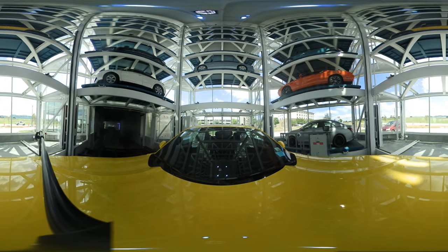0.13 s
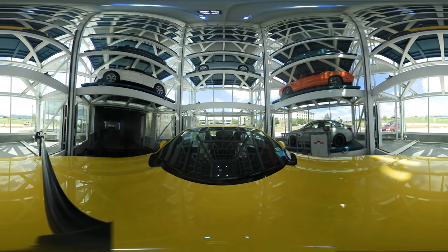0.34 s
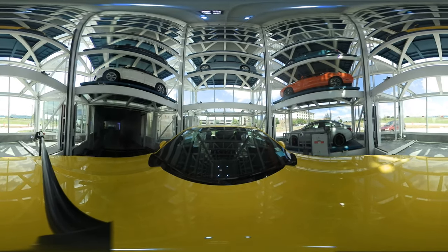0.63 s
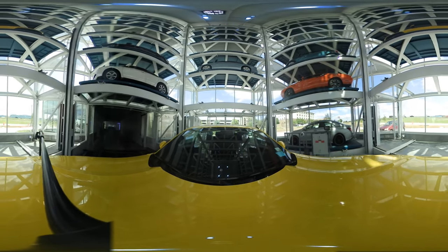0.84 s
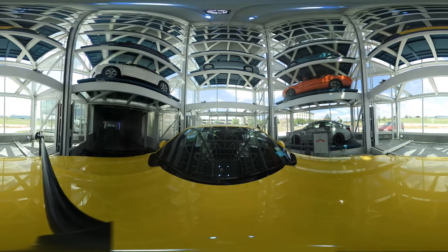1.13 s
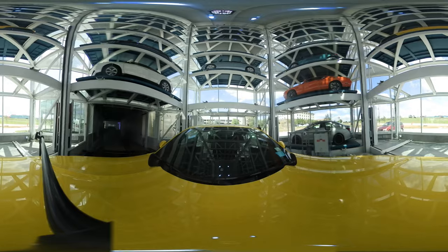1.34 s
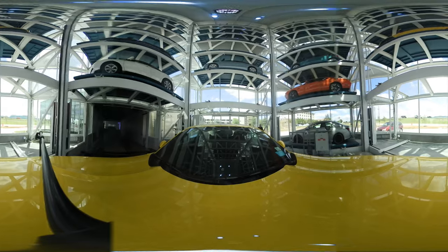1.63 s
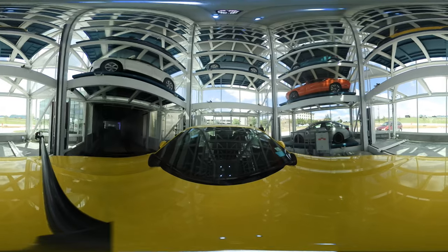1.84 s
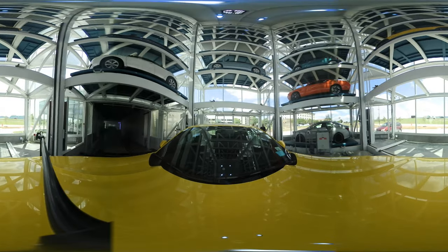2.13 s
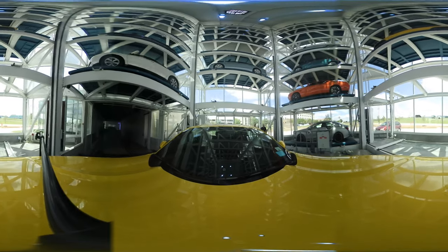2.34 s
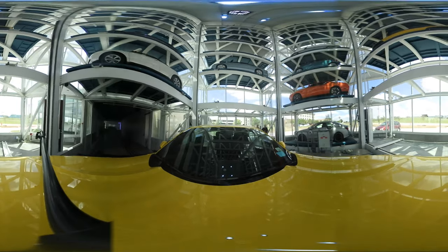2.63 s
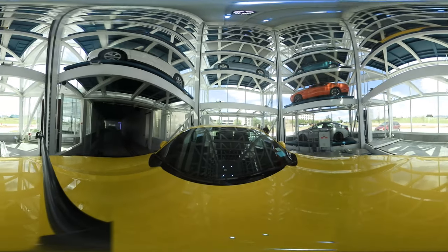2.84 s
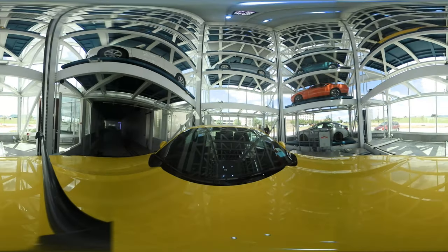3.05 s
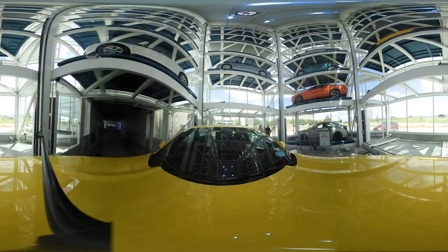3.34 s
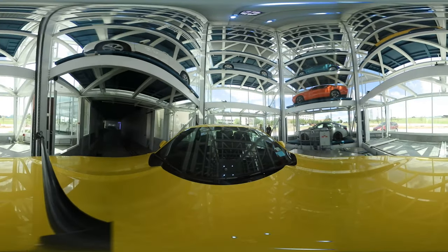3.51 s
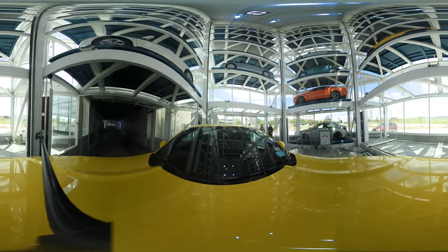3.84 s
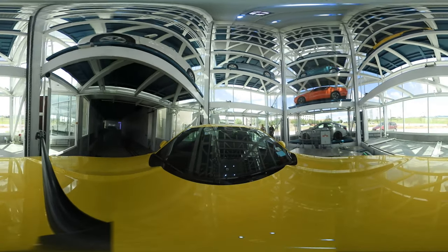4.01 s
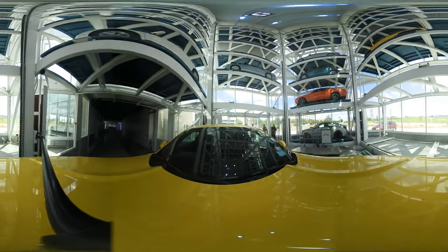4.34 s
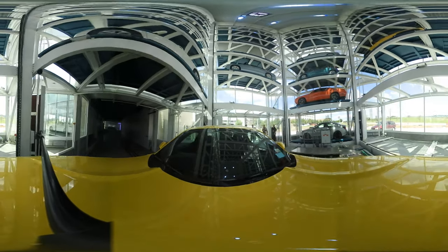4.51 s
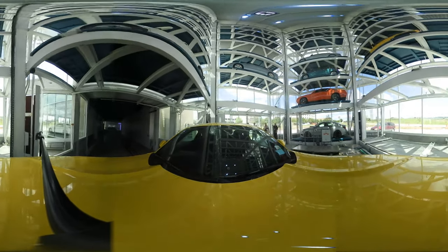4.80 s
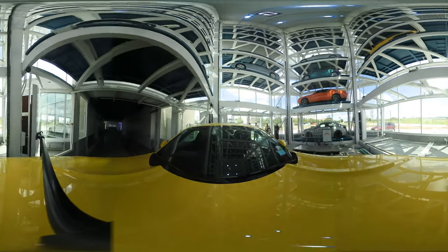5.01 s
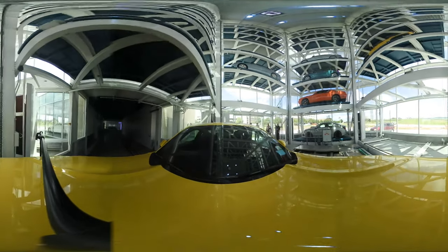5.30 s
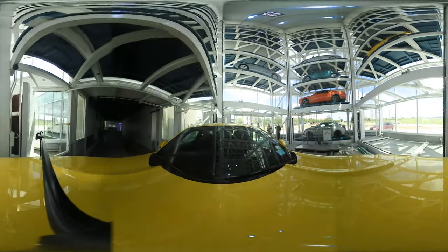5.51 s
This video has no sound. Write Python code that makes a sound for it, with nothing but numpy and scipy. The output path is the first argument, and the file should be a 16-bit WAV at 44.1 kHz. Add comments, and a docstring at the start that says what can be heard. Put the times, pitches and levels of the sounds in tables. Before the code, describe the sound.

A car lift rumbles, whirs and thuds along under a motor hum, then dies down as its deck creaks and clicks close by.

```python
"""Car lift in a steel and glass tower.

Taken from a camera sitting on the body of a car as the lift carriage carries it. Rollers rumble, whir and
thud through the deck, a little to the right, over the hum of an inverter-fed motor; the run eases, builds
again and dies down. Close by, the loaded deck creaks and slips in clusters of dry clicks. The far walls
return a faint wash, and the camera passes the treble on 10 ms late."""
import sys
import numpy as np
from scipy import signal
from scipy.fft import rfft, irfft
from scipy.io import wavfile
from scipy.ndimage import uniform_filter1d, minimum_filter1d, map_coordinates

SR = 44100
rng = np.random.default_rng(int(sys.argv[2]) if len(sys.argv) > 2 else 0)


def to_wav(s):
    """Save 16-bit WAV."""
    ch = np.atleast_2d(s).T  # columns
    pcm = np.round(np.clip(ch, -1, 1) * 32767)  # PCM
    wavfile.write(sys.argv[1], SR, pcm.astype(np.int16))


N = 250047
TIME = np.arange(N) / SR
EVENT_SIZE, EVENT_LEAD = 4096, 256  # samples in one click or thud, and ahead of its impact

# How hard the carriage runs. Each row: time in seconds, relative whir and rumble levels in dB.
RUN_LEVELS = [(0.0, -17, -29), (0.39, -18, -26), (0.93, -19, -20.5), (1.22, -20, -18), (1.47, -22, -20),
              (1.66, -20.5, -21), (1.78, -23, -21.5), (1.93, -29.5, -33), (2.19, -28, -27.5),
              (2.79, -28.5, -29.5), (3.3, -21, -20), (3.66, -22, -21.5), (3.74, -20.5, -17),
              (3.87, -30.5, -29.5), (4.47, -36, -36), (5.12, -39, -37), (5.32, -37.5, -36.5),
              (5.67, -41, -44)]
# The deepest rumble. Each row: time in seconds, level in dB.
DEEP_LEVELS = [(0, -33), (.4, -39), (.7, -26.5), (1.8, -26.5), (1.97, -36.5), (2.7, -34.5), (3.0, -30),
               (3.5, -33.5), (3.85, -45), (4.6, -52), (5.67, -52)]
# The drive. Each row: time in seconds, motor hum in dB, inverter whine in dB.
DRIVE_LEVELS = [(0, -22, -59), (.7, -48, -62), (1.35, -24, -68.5), (1.8, -25.5, -75), (2.1, -38.5, -76),
                (2.6, -29.5, -71), (2.95, -27.5, -75), (3.4, -24, -64), (4.1, -41, -91), (5.67, -89, -93)]
# Inverter switching tones. Each row: pitch in Hz, level against the whine in dB.
INVERTER_TONES = [(5912, 5.5), (6002, 3.5), (8010, 1)]
# Heavy bumps of the rollers. Each row: start in seconds, clunk peak in dB, boom peak in dB.
ROLLER_BUMPS = [(0.859, -4, -23), (1.324, -10, -7.5), (1.4, -12, -16), (1.543, -10, -9.5),
                (1.698, -13, -23), (2.195, -32, -12), (2.217, -3, -23), (3.199, -9.5, -24),
                (3.371, -4, -27), (3.391, -9, -17), (3.4505, -1, -36), (3.4925, -10, -26), (3.742, 6, -8),
                (3.823, -13, -10), (3.8486, -7, -12.5), (4.209, -21, -21), (4.262, -25, -24),
                (5.411, -24, -34)]
# Slips of the loaded deck. Each row: start in seconds, level in dB, hardness (relative snap level) in dB,
# relative knock level in dB, drag in milliseconds.
DECK_SLIPS = [(.862, -22, -17, 5, 3.6), (1.146, -21, -24, 1, 1.1), (1.2441, -19.5, -20, 2, 3.8),
              (1.4309, -18.5, -12.5, 5, 0.69), (1.435, -23, -28, 3, 1.6), (1.7563, -20.5, -20, 5.5, 2.7),
              (1.815, -23, -8, -14, 4.5), (1.8445, -38, -9, 5, 2.7), (1.854, -33.5, -23, 14.5, 2.7),
              (1.8628, -28, -20, 11, 4), (1.886, -19.5, -31, 6, 1.3), (1.905, -31, -12, 6, 7.4),
              (1.921, -25, -7.5, 8.5, 4.8), (2.2185, -18, -10, 1, 0.54), (2.223, -27, -31, 2, 0.56),
              (2.3726, -25.5, -9.5, 4, 9.3), (2.394, -27.5, -4.5, -2, 4.8), (2.4203, -27, -10, -2, 6.2),
              (2.4551, -20, -12, 1, 6.6), (2.4999, -23.5, -10, 3, 1.7), (2.511, -31.5, -8, 7, 3),
              (2.522, -26, -9.5, -2, 8.1), (2.558, -32.5, -15, 9, 5), (2.6903, -32, -10, 9.5, 5),
              (2.7057, -24, -16.5, 1.5, 6), (2.8893, -29, -15, 7, 8.1), (2.902, -30.5, -17, 8, 7),
              (3.3672, -26.5, -15, 14, 3.5), (3.404, -26, -15, 6, 3), (3.421, -17, -27, 0, 1),
              (3.427, -18.5, -26, 3, 2.4), (3.517, -26.5, -14, 2, 5.7), (3.757, -21.5, -12.5, 5.5, 4),
              (3.8638, -20.5, -7, 0, 3.1), (3.882, -24.5, -6, 0, 2.2), (3.901, -19.5, -11.5, -3.5, 2.8),
              (3.913, -34.5, 0.5, -4, 6), (3.9605, -29, -20, -3, 1.7), (4.0536, -22, -11.5, 1.5, 1.6),
              (4.0634, -27, -17, 3, 16), (4.1448, -26, -10, 5.5, 1.2), (4.166, -25, -15, -0.5, 4.5),
              (4.2049, -27, -21, 6, 3.3), (4.221, -35, -18, 5, 7.3), (4.2394, -28.5, -3.5, 1, 15),
              (4.2626, -15.5, -11, -6, 1.9), (4.293, -50.5, 10, -8, 2.8), (4.3464, -40, -10, 8, 3.7),
              (4.388, -42, -13, 9, 3), (4.4312, -33, -15, 8, 1.6), (4.4553, -39, -12, -10, 3),
              (4.481, -34.5, -13, 3, 6), (4.506, -31.5, -6, 6, 7), (4.5279, -27, -4, -13, 7),
              (4.542, -33, 5, 0, 4.3), (4.5498, -23, -7, -4, 1.6), (4.5535, -24.5, -3.5, -5.5, 5.3),
              (4.578, -38.5, 2.5, -3, 4.6), (4.597, -40.5, -2, 4, 5.8), (4.6166, -35.5, -7.5, 5, 4),
              (4.633, -38.5, 2, 0, 2.4), (4.6993, -33, -11.5, -17, 2.9), (4.709, -39, 7, -20, 8.8),
              (4.789, -38, -3, 8, 10), (4.8266, -27, -14, -3.5, 1.5), (4.8594, -43, -9, 6, 5),
              (4.895, -41.5, 8, -5, 6.2), (4.91, -38, 1, -16, 4.2), (4.9492, -40, -17, -3, 3),
              (4.9642, -22.5, -3.5, -8, 2.1), (4.9795, -26.5, 0, -2.5, 3.4), (4.9915, -38, 3, -10, 2.1),
              (5.018, -39, -10, 5, 2.2), (5.0554, -38.5, -18, -2, 2), (5.1402, -41, -5, -2, 1.8),
              (5.157, -44, -1, 3, 4.6), (5.199, -40.5, 2, -12, 2.9), (5.29, -32.5, -15, 0, 5.6),
              (5.3718, -45, -5, -11, 6), (5.4105, -23, -2.5, -3, 2.3), (5.4385, -36.5, -12, 1, 2.6),
              (5.4657, -36, -17, -0.5, 3.5), (5.5954, -31, 1.5, -6, 7.1), (5.634, -33, -15, 1.5, 1.1)]
# Harder clicks tend to ring higher. Each row: hardness in dB, ring pitch in Hz.
RING_BY_HARDNESS = [(-22.5, 1730), (-10.5, 1690), (-5, 2200), (-2.5, 5400), (3, 3050)]
# The deck strains and lets go with a crack. Each row: release and build-up in seconds, creak level in dB,
# duck depth of the rolling noise in dB.
DECK_STRAINS = [(1.436, 0.077, -42.5, 4.5), (1.917, 0.26, -21.5, -1), (2.219, 0.1, -45, 6.5),
                (2.522, 0.13, -25.5, 3.5), (3.439, 0.099, -36, 3.5), (3.884, 0.085, -20.5, 3),
                (4.264, 0.042, -23, 7), (4.56, 0.077, -33, 12), (4.72, 0.15, -42, -0.5),
                (4.987, 0.14, -33.5, 10.5), (5.42, 0.033, -32, 5)]
# Panel resonances. Each row: centre and width in Hz, lift when rolled on and when struck in dB.
PANEL_MODES = [(58, 4.2, 6.5, 0.5), (85.7, 7, 9.5, 12.5), (108.4, 5.4, 6.5, 9.5), (157.5, 79, 5.5, 10.5),
               (418.5, 19, 6.5, -1), (602, 140, 5.5, 4), (667, 53, 7, 9.5), (803, 58, 2, 6.5),
               (1038, 4.8, 9, 5), (1290, 100, 3.5, 6.5), (1633, 59, 8, 11), (2280, 130, 1.5, 9.5),
               (2730, 620, 3, 3), (4420, 78, -9.5, 8), (4770, 100, -0.5, 7), (5260, 210, 4, 9.5),
               (8100, 380, 6.5, -3)]
# The tone of each kind of contact. Each row: frequency in Hz, relative spectral density in dB.
ROLL_SPECTRUM = [(22, -38.5), (52, -4.5), (170, 1), (290, -9.5), (470, -4.5), (800, -8), (1150, -5.5),
                 (1450, -14), (3000, -21), (3900, -26.5), (6000, -44.5), (8500, -54), (10000, -70),
                 (12000, -61.5), (13500, -84.5), (15500, -79.5)]
THUD_SPECTRUM = [(30, -29), (90, 7.5), (280, 0), (420, 1), (600, 0), (900, -15.5), (1500, -15.5),
                 (3000, -39), (7000, -70), (15000, -110)]
CLICK_SPECTRUM = [(80, -9), (280, -10.5), (650, 7.5), (1080, -4), (1600, 9), (3000, 7), (3900, -13.5),
                  (5200, -23), (7000, -25.5), (9000, -35.5), (10500, -47.5), (13000, -59), (15000, -62.5)]
CREAK_SPECTRUM = [(80, -20.5), (280, -5.5), (650, -4), (1080, -8.5), (1600, -13.5), (3000, -12.5),
                  (3900, -22), (5200, -29.5), (7000, -30.5), (9000, -51.5), (10500, -54), (15000, -76)]
# Stereo width at the microphone. Each row: frequency in Hz, side against mid in dB.
STEREO_WIDTH = [(35, -15), (60, -8), (100, -31.5), (150, 2.5), (220, -3.5), (350, -10), (620, -16),
                (1200, -15), (2000, -13.5), (2900, -23.5), (3700, -6.5), (4400, 2), (8000, 0.5),
                (15000, -3)]


def undb(db):
    """Decibels to gain."""
    return 10 ** (np.asarray(db) / 20)


def unit(x):
    """Scale to rms 1."""
    return x / np.sqrt(np.mean(x ** 2))


def curves(table):
    """The columns of a time table, sample by sample."""
    times, *columns = np.transpose(table)
    return [np.interp(TIME, times, column) for column in columns]


def wander(rate_hz):
    """A smooth random wander of rms 1."""
    knots = rng.standard_normal(2048)
    return unit(map_coordinates(knots, [TIME * rate_hz], order=3, mode="wrap"))


def bins(size):
    """Frequencies in Hz of a spectrum of this many samples."""
    return np.maximum(np.arange(size // 2 + 1) * SR / size, 1)


def gain_at(points, f):
    """The gain of a table of Hz and dB at the frequencies f."""
    hz, db = np.transpose(points)
    return undb(np.interp(np.log(f), np.log(hz), db))


def split(spectrum, edges_hz, size):
    """A spectrum cut into adjoining bands, each returned as sound."""
    f = bins(size)
    below = [0] + [1 / (1 + (f / hz) ** 12) for hz in edges_hz] + [1]
    return [irfft(spectrum * (hi - lo), size) for lo, hi in zip(below, below[1:])]


def ring_panels(push, tone, rolling=False):
    """A mid push and a side push ring the panels: left and right spectra at the microphone."""
    size = push.shape[-1]
    f = bins(size)
    lift = 0
    for hz, width_hz, rolled_db, struck_db in PANEL_MODES:
        extra_power = undb(rolled_db if rolling else struck_db) ** 2 - 1
        lift = lift + extra_power / (1 + (2 * (f - hz) / width_hz) ** 2)
    # minimum phase, so the ringing follows the push
    cepstrum = irfft(np.log(gain_at(tone, f)) + .5 * np.log(np.maximum(1 + lift, .5)), size)
    response = np.exp(rfft(np.r_[cepstrum[0], 2 * cepstrum[1:size // 2]], size))
    mid, side = rfft(push) * response
    side = side * gain_at(STEREO_WIDTH, f)
    return np.array([mid + side, mid - side])


def local_ring(hz, db, width_hz=220):
    """Response of a struck spot: the push itself plus one resonance."""
    return 1 + undb(db) / (1 + 2j * (bins(EVENT_SIZE) - hz) / width_hz)


def grains(per_s, spread_db):
    """Random tiny impacts of unequal size, for mid and side."""
    hit = rng.random(N) < per_s / SR
    return hit * undb(spread_db * rng.standard_normal(N).clip(-2, 2)) * rng.standard_normal((2, N))


def contacts(count, scrape, scrape_s, rattle, rattle_s):
    """For each event a scrape that creeps in, a sharp push and a weaker, ragged rattle."""
    t = (np.arange(EVENT_SIZE) - EVENT_LEAD) / SR
    chatter = rng.standard_normal((count, 2, EVENT_SIZE)).transpose(1, 0, 2)
    ragged_db = 4 * rng.standard_normal((count, EVENT_SIZE // 128)).clip(-2, 1.5)
    rattling = undb(np.repeat(ragged_db, 128, axis=1)) * (t >= 0) * np.exp(-np.abs(t) / rattle_s)
    dragging = np.exp(-np.abs(t) / (scrape_s * np.where(t < 0, .41, 1)))  # rises faster than it dies
    push = chatter * (scrape * dragging + rattle * rattling)
    push[..., EVENT_LEAD] += 1
    return push


def place(times, sounds):
    """Lay event sounds out in time, each faded in and out."""
    corners = (0, EVENT_LEAD // 2, EVENT_SIZE - 4 * EVENT_LEAD, EVENT_SIZE - 1)
    fade = np.sin(np.pi / 2 * np.interp(np.arange(EVENT_SIZE), corners, (0, 1, 1, 0))) ** 2
    out = np.zeros((2, N + 2 * EVENT_SIZE))
    for k, time_s in enumerate(times):
        start = max(int(time_s * SR) - EVENT_LEAD, 0)
        out[:, start:start + EVENT_SIZE] += fade * sounds[:, k]
    return out[:, :N]


def rollers(duck_db):
    """Dense contacts of rollers on rails shake the deck; the harder they run, the brighter they rush."""
    run_db, rumble_db = curves(RUN_LEVELS)
    deep_db, = curves(DEEP_LEVELS)
    push = unit(grains(per_s=1500, spread_db=-1.0)) + undb(3.5) * rng.standard_normal((2, N))
    shaking = ring_panels(push, ROLL_SPECTRUM, rolling=True)
    deep, rumble, whir, rush, hiss = split(shaking, edges_hz=(74, 205, 900, 1600), size=N)
    whir_db = run_db - duck_db + .51 * wander(45)
    full_run_db = -19.5
    above_full_db = run_db - duck_db - full_run_db
    return (unit(deep) * undb(deep_db)
            + unit(rumble) * undb(rumble_db + 1 - .61 * duck_db + wander(9))
            + unit(whir) * undb(whir_db - 1.5)
            + unit(rush) * undb(whir_db - 7 + .29 * above_full_db)
            + unit(hiss) * undb(whir_db - 7.5 + .14 * above_full_db))


def drive(hum_hz=562.5):
    """The motor's gear hum wavers with the load; the inverter sings faintly above it."""
    hum_db, whine_db = curves(DRIVE_LEVELS)
    cycles = np.cumsum(hum_hz * (1 + .0075 * wander(40))) / SR
    out = np.sin(2 * np.pi * cycles) * undb(hum_db + 2 * wander(25))
    for hz, db in INVERTER_TONES:
        stereo_hz = hz + 6 * np.array([wander(30), wander(30)])
        phase = 2 * np.pi * np.cumsum(stereo_hz, axis=1) / SR
        out = out + np.sin(phase) * undb(whine_db + db + 2 * wander(25))
    return out


def thuds():
    """A roller drops over a bump: the panel clunks for a few cycles and the deck booms beneath it."""
    start_s, clunk_db, boom_db = np.transpose(ROLLER_BUMPS)
    push = contacts(len(start_s), scrape=.06, scrape_s=.005, rattle=.012, rattle_s=.011)
    struck = ring_panels(push, THUD_SPECTRUM) * local_ring(hz=620, db=-2.5)
    boom, clunk = split(struck, edges_hz=(280,), size=EVENT_SIZE)
    sounds = 0
    for part, peak_db in ((clunk, clunk_db), (boom, boom_db)):
        peak = np.abs(part).max(axis=(0, 2))
        sounds = sounds + part * (undb(peak_db) / peak)[:, None]
    return place(start_s + .00074, sounds)


def clicks(spit_from_db=-31.5):
    """Each slip of the deck gives a knock, a ringing click and a snap; loud snaps spit at the very top."""
    start_s, db, hardness_db, knock_db, drag_ms = np.transpose(DECK_SLIPS)
    count = len(start_s)
    ring_hz = np.interp(hardness_db, *np.transpose(RING_BY_HARDNESS))
    ring_hz *= 1 + .04 * rng.standard_normal(count)  # each slip catches at a slightly different spot
    drag_s = drag_ms[:, None] / 1000
    # the higher the vibration, the sooner it dies
    slow = contacts(count, scrape=.2, scrape_s=drag_s, rattle=.085, rattle_s=.009)
    quick = contacts(count, scrape=.26, scrape_s=drag_s, rattle=.022, rattle_s=.0036)
    instant = contacts(count, scrape=.4, scrape_s=.0014, rattle=.02, rattle_s=.006)
    ringing = ring_panels(slow, CLICK_SPECTRUM) * local_ring(ring_hz[:, None], db=2.5)
    edges_hz = (1100, 3700, 12500)
    knock, click, _, _ = split(ringing, edges_hz, EVENT_SIZE)
    snap = split(ring_panels(quick, CLICK_SPECTRUM), edges_hz, EVENT_SIZE)[2]
    spit = split(ring_panels(instant, CLICK_SPECTRUM), edges_hz, EVENT_SIZE)[3]
    snap_db = db + hardness_db
    spit_db = snap_db + np.interp(snap_db - spit_from_db, (-2, 2), (-46, -22))
    parts = ((knock, db + knock_db + .5), (click, db + .5), (snap, snap_db + 2), (spit, spit_db))
    sounds = 0
    for part, part_db in parts:
        strength = np.sqrt((part ** 2).sum(-1).mean(0) / (.008 * SR))  # rms as if packed into 8 ms
        sounds = sounds + part * (undb(part_db) / strength)[:, None]
    return place(start_s + .0004, sounds)


def strain(let_go_s=.012, recover_s=.2):
    """Each creak swells to a crack; the rolling noise then ducks as the camera's gain dips and recovers."""
    creak_gain, duck_db = 0, 0
    for release_s, build_s, creak_db, depth_db in DECK_STRAINS:
        before, after = np.maximum(release_s - TIME, 0), np.maximum(TIME - release_s, 0)
        held = np.exp(-after / let_go_s)
        creak_gain = creak_gain + undb(creak_db) * np.exp(-before / build_s) * held
        duck_db = duck_db + depth_db * (1 - held) * np.exp(-(after / recover_s) ** 2)
    return creak_gain, duck_db


def ticks(per_s, spread_db, scrape_s=.0015):
    """Random tiny slips, each a brief scrape on the panels; rms 1."""
    slips = np.abs(grains(per_s, spread_db)[0])
    envelope = signal.lfilter([1], [1, -np.exp(-1 / (scrape_s * SR))], slips)
    scrapes = envelope * rng.standard_normal((2, N))
    return unit(irfft(ring_panels(scrapes, CREAK_SPECTRUM), N))


def creaks(creak_gain):
    """Under strain the panels groan and tiny slips grow louder; faint ticking goes on in between."""
    rubbing = ring_panels(rng.standard_normal((2, N)), CREAK_SPECTRUM)
    groan = split(rubbing, edges_hz=(480, 850), size=N)[1]
    strained = ticks(per_s=320, spread_db=2.5) + unit(groan) * undb(-6.5 + 1.3 * wander(45))
    settling = ticks(per_s=800, spread_db=0)
    return strained * creak_gain + settling * undb(-47)


def tower(x, t60_s, wet_db):
    """Steel and glass, far from the microphone, return a faint, dull wash."""
    t = TIME[:SR]
    envelope = np.exp(-np.log(1000) * t / t60_s) * (1 - np.exp(-t / .012))
    tail = rng.standard_normal((2, SR)) * envelope
    tail = signal.sosfilt(signal.butter(1, 3500, fs=SR, output="sos"), tail)
    return undb(wet_db) * signal.fftconvolve(x, unit(tail) / np.sqrt(SR), axes=1)[:, :N]


def limiter(x, ceiling=.92):
    """The camera's gain dips smoothly around the highest peaks."""
    size = int(.004 * SR)
    gain = minimum_filter1d(ceiling / np.maximum(np.abs(x).max(axis=0), ceiling), 2 * size)
    return x * uniform_filter1d(uniform_filter1d(gain, size), size)


def scene():
    """From the car's body: running gear a little to the right, clicks close by, the tower far off."""
    creak_gain, duck_db = strain()
    gear = (rollers(duck_db) + drive() + thuds()) * undb([[-.6], [.6]])
    near = gear + clicks() + creaks(creak_gain)
    return near + tower(near, t60_s=1.0, wet_db=-48)


def record(dry):
    """The camera limits the peaks, delays the treble against the rest and cuts the top."""
    treble_hz, top_hz = 3800, 15800
    treble_lag_s, left_lag_s = .00998, .000035
    size = N + EVENT_SIZE + 1
    f = bins(size)
    # the sound fades in over 2 ms, so it starts without a click
    faded_in = dry * np.sin(np.pi / 2 * np.minimum(TIME / .002, 1)) ** 2
    low_share = 1 / (1 + (f / treble_hz) ** 24)
    # the lower band reaches the left microphone port a moment later
    prompt = low_share * np.exp(-2j * np.pi * f * np.array([[left_lag_s], [0]]))
    late = (1 - low_share) * np.exp(-2j * np.pi * f * treble_lag_s)
    # where the two bands overlap, they comb
    out = irfft(rfft(limiter(faded_in), size) * (prompt + late), size)[:, :N]
    return signal.sosfilt(signal.ellip(10, .2, 80, top_hz, fs=SR, output="sos"), out)


dry = scene()
out = record(dry)
to_wav(out)
```